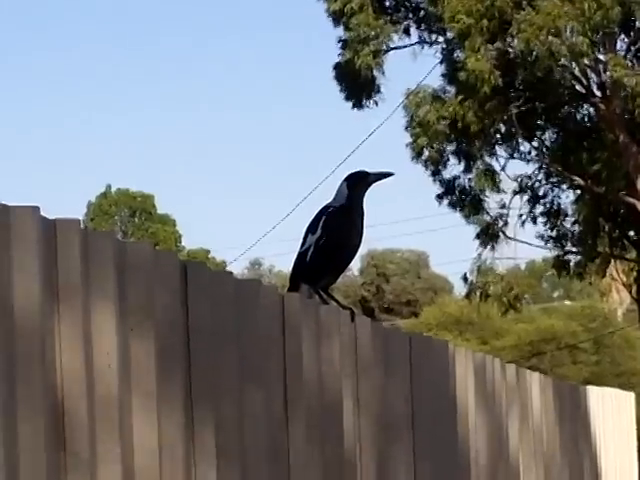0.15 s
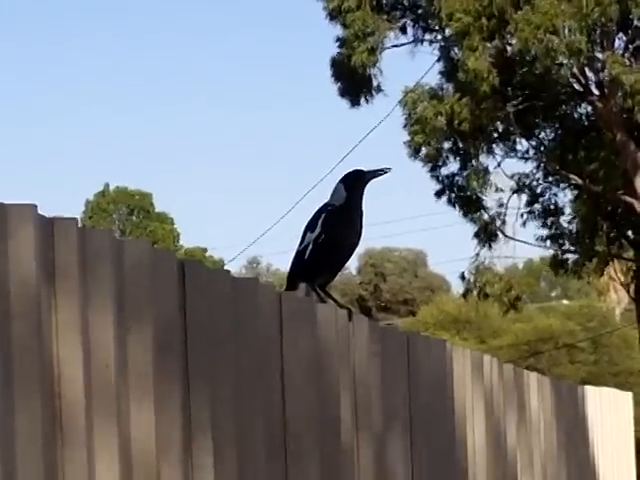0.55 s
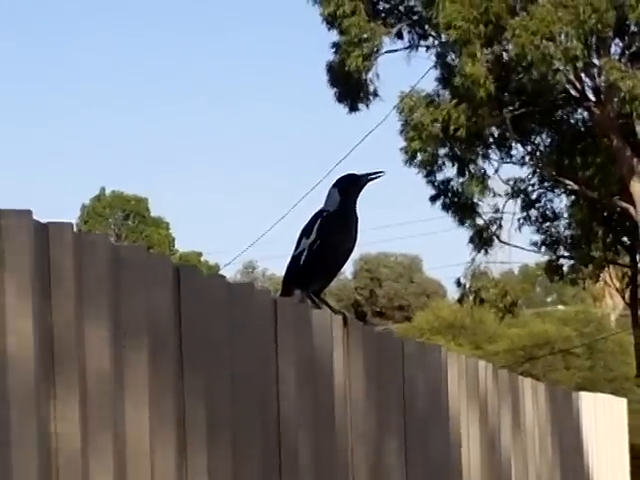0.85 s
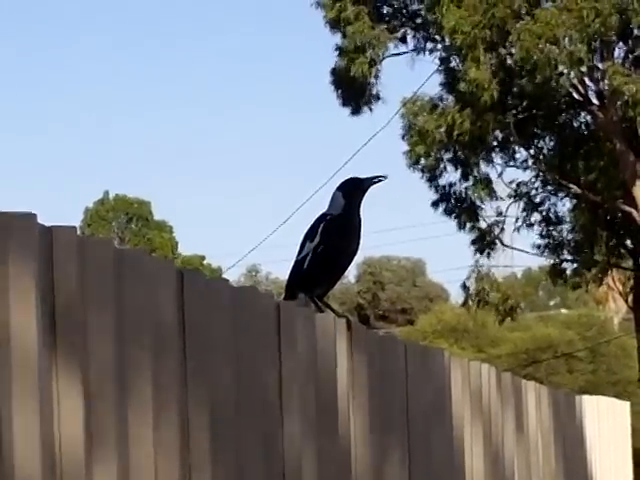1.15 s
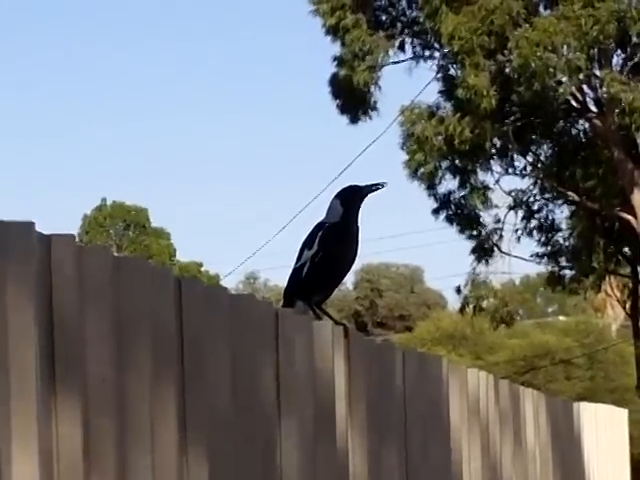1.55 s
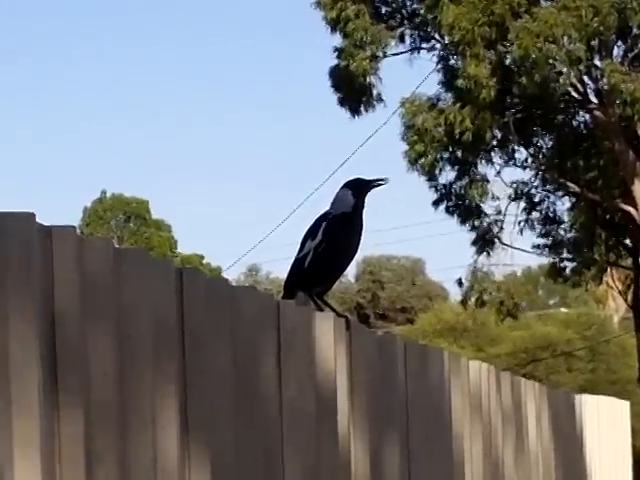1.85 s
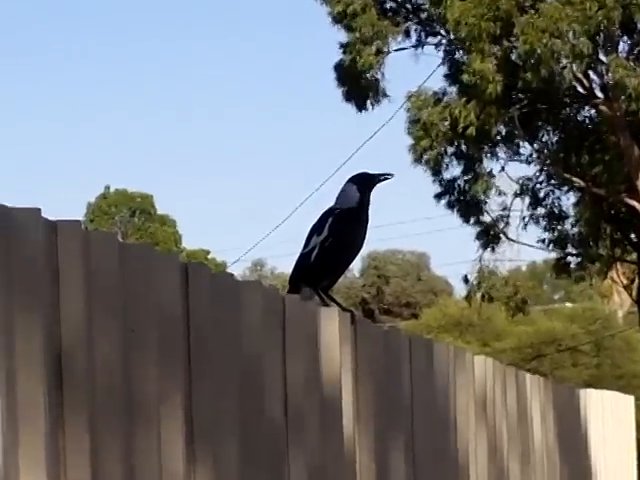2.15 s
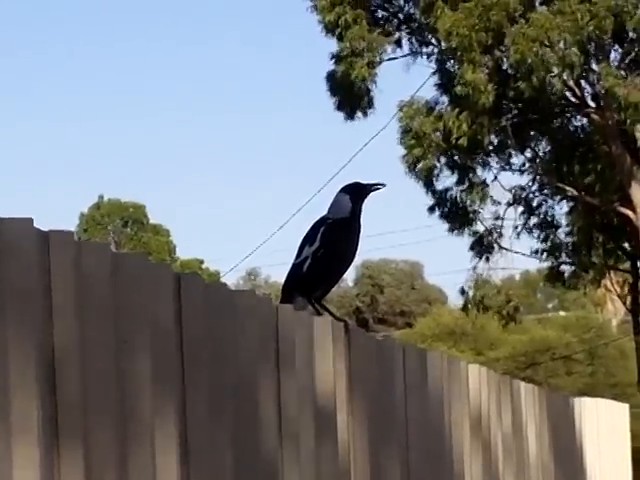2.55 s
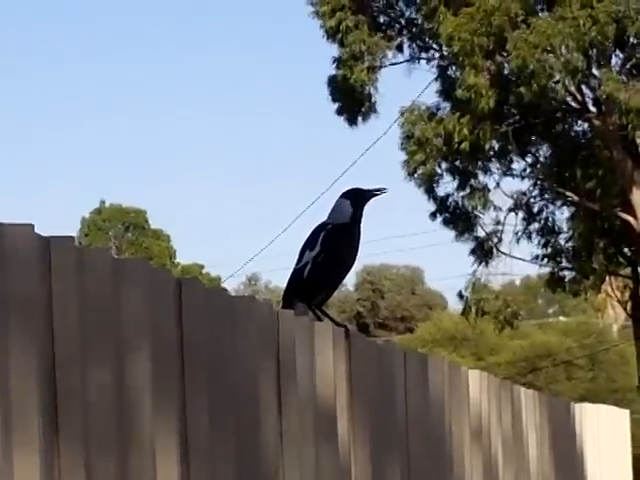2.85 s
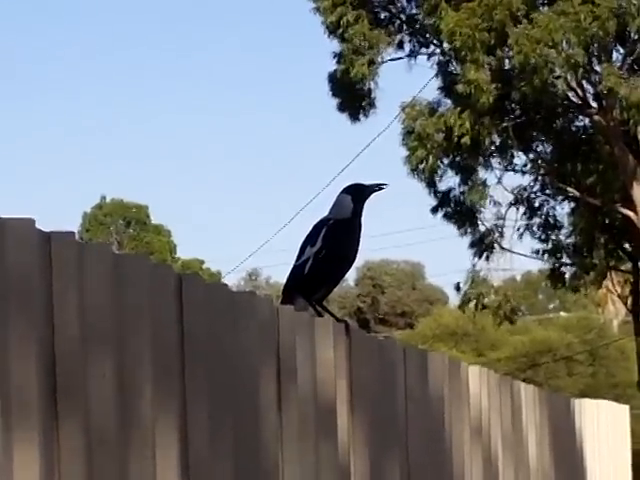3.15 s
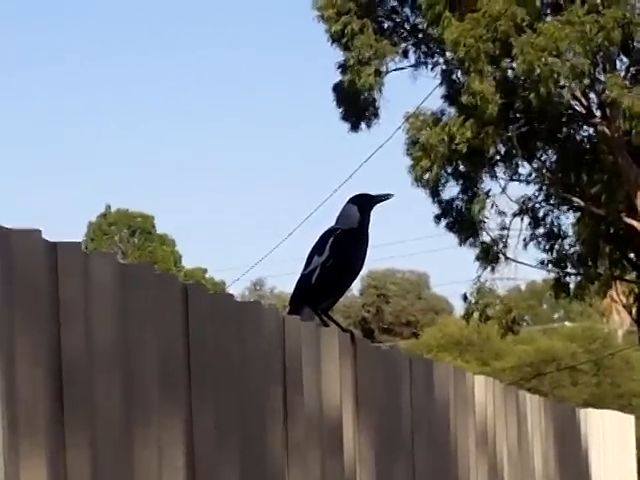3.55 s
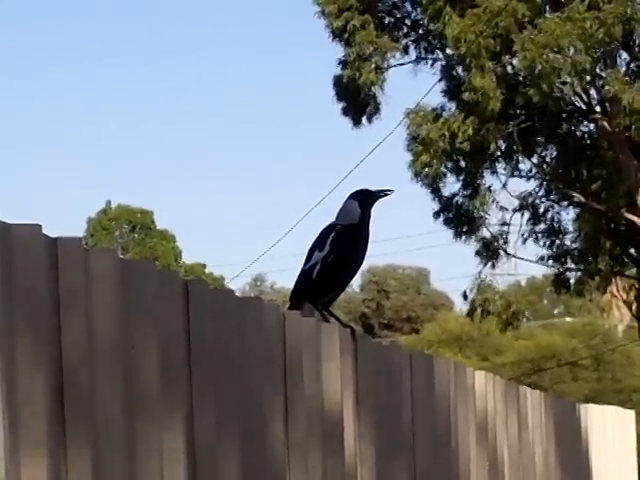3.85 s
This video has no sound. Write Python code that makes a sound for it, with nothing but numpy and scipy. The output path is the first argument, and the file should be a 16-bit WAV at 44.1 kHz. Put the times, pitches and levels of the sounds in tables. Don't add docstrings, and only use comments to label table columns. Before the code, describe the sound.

A magpie warbles mid-pitched, flute-like notes, some throbbing in quick pulses, others doubled or raspy. Pulses come near 0.5 s, a long wavering note 0.6-0.8, a steady one at 1.0-1.2, then softer low bits. Two loud buzzy chirps from a small bird strike at 1.95 and 2.05. Falling notes follow at 2.2-2.4 and 3.2, fluttering bits to 4. Faint peeps, dull yard echo, steady traffic hum, car swell at 3.

```python
import sys
import numpy as np
from scipy import signal
from scipy.fft import rfft, irfft
from scipy.io import wavfile
from scipy.ndimage import uniform_filter1d

SR = 44100
rng = np.random.default_rng(int(sys.argv[2]) if len(sys.argv) > 2 else 0)


def amplitude_ratio(level_db):
    exponent = np.asarray(level_db, float) / 20
    return 10 ** exponent


def unload_wav(signal):
    wavfile.write(
        sys.argv[1],
        SR,
        np.round(np.clip(np.atleast_2d(signal).T, -1, 1) * 32767).astype(np.int16),
    )


N = 176400


def colour(x, points):
    hz, db = np.array(points, float).T
    log_f = np.log(np.arange(len(x) // 2 + 1) * SR / len(x) + 1)
    gain = amplitude_ratio(np.interp(log_f, np.log(hz), db))
    return irfft(rfft(x) * gain, len(x))


def unit(x):
    return x / np.sqrt(np.mean(x ** 2))


def walk(rate_hz):
    values = np.interp(np.arange(N) * rate_hz / SR, np.arange(8192), rng.standard_normal(8192))
    return unit(uniform_filter1d(values, max(int(SR / rate_hz), 2)))


# frequency_hz, level_db
THROAT_OVERTONES = [(1500, -27), (2020, -22), (2350, -45), (3000, -30), (3500, -36), (4500, -31),
                    (5700, -40), (7000, -47)]


def whistle(curves, bend, flutter_db, edge_s):
    effort, loud_db = 1.2, -40
    out = np.zeros(N)
    throat = np.array(THROAT_OVERTONES).T
    unsteady = [amplitude_ratio(2.8 * walk(35) - 2.5) for k in range(7)]
    for rows in curves:
        s, hz, db = np.array(rows, float).T
        i = np.arange(max(int(s[0] * SR), 0), min(int(s[-1] * SR), N))
        t = i / SR
        to_nearest_end = np.minimum(t - s[0], s[-1] - t)
        edge = np.sin(np.pi / 2 * np.clip(to_nearest_end / edge_s, 0, 1)) ** 2
        f = np.interp(t, s, hz) * bend[i]
        level_db = np.interp(t, s, db) + flutter_db[i]
        phase = 2 * np.pi * np.cumsum(f) / SR
        overtones = 0
        for k in range(2, 7):
            overtones = overtones + amplitude_ratio(np.interp(k * f, *throat)) * unsteady[k][i] * np.sin(k * phase)
        tone = np.sin(phase) + overtones * amplitude_ratio(effort * (level_db - loud_db))
        out[i] += amplitude_ratio(level_db) * edge * np.sqrt(2) * tone
    return out


def glides(rows):
    return [[(s, first_hz, db), (s + length_s, last_hz, db)] for s, length_s, first_hz, last_hz, db in rows]


# frequency_hz, density_db
TRAFFIC_SPECTRUM = [(22, -40.5), (100, -17), (350, -12), (1100, 0.5), (2000, -10.5), (2600, -19),
                    (8000, -27.5), (12800, -35)]
# peak_s, rise_s, fall_s, level_db
RUSH_TIMES = [
    (2.987, 0.03, 0.39, -56),
    (0.021, 0.074, 0.12, -65),
]
# frequency_hz, gain_db
RUSH_SPECTRA = [
    [(150, -30), (700, 4), (1200, 2), (2200, -13.5), (4500, -17), (9000, -39)],
    [(500, -20), (1200, -5), (2500, -7), (5000, -4.5), (7500, -3.5), (10000, -28)],
]


def town():
    t = np.arange(N) / SR
    hum_db = -60 + 0.5 * walk(1.5) + 0.7 * walk(9)
    out = unit(colour(rng.standard_normal(N), TRAFFIC_SPECTRUM)) * amplitude_ratio(hum_db)
    for (peak_s, rise_s, fall_s, db), points in zip(RUSH_TIMES, RUSH_SPECTRA):
        swell = np.exp(-((t - peak_s) / np.where(t < peak_s, rise_s, fall_s)) ** 2)
        rush = unit(colour(rng.standard_normal(N), points))
        out = out + rush * swell * amplitude_ratio(db + walk(25))
    return signal.sosfilt(signal.butter(6, 13000, fs=SR, output="sos"), out)


# start_s, length_s, first_hz, last_hz, level_db
FAR_WHISTLES = [(.09, .13, 3250, 3850, -73), (.19, 0.09, 3500, 3200, -73), (1.53, 0.21, 4520, 4560, -73),
                (1.545, .19, 4830, 4800, -74.5), (1.74, .1, 4620, 4500, -79),
                (3.33, 0.221, 3301, 3101, -75.5), (0.0, 0.017, 1286, 1911, -54.6),
                (2.781, .41, 733, 691, -64.1), (1.331, 0.092, 1049, 1321, -57.1),
                (1.751, .101, 995, 1310, -59.1), (1.42, .3, 3350, 3250, -77), (3.04, .08, 4500, 4450, -78)]
# start_s, length_s, first_hz, last_hz, level_db
FAR_PEEPS = [(.17, .11, 3750, 3900, -76), (.27, .035, 5150, 5150, -75), (.385, .022, 4100, 4800, -73),
             (.655, .04, 3760, 3550, -69), (1.228, .04, 4220, 3920, -72), (1.272, .033, 3950, 4180, -73),
             (1.35, .032, 3320, 3080, -73), (1.39, .035, 2820, 2740, -80), (1.32, .09, 5450, 5480, -81),
             (1.62, .2, 4000, 4000, -78), (1.67, .065, 6220, 6050, -79), (2.812, .018, 4400, 4950, -69),
             (3.052, .028, 6000, 6150, -77.5), (3.11, .025, 6200, 6300, -77), (3.084, .02, 6150, 6200, -77),
             (3.13, .02, 5600, 5200, -76), (3.195, .025, 8900, 8400, -77)]


def far_birds():
    out = 0
    t = np.arange(SR // 2) / SR
    for rows, waver, t60_s in ((FAR_WHISTLES, 0.034, 0.45), (FAR_PEEPS, 0.006, 0.08)):
        direct = whistle(glides(rows), 1 + waver * walk(500), 2.5 * walk(90), 0.0084)
        smear = rng.standard_normal(SR // 2) * 1000 ** (-t / t60_s)
        out = out + signal.fftconvolve(direct, smear / np.linalg.norm(smear))[:N]
    return out


# time_s, pitch_hz, level_db
CHIRP_ARCHES = [
    [(1.944, 1730, -62), (1.95, 1786, -45.5), (1.958, 1865, -41), (1.968, 1734, -46), (1.978, 1620, -55.5),
     (1.987, 1490, -71)],
    [(2.037, 1870, -66), (2.043, 1961, -46), (2.052, 2216, -39), (2.063, 2387, -36), (2.085, 2433, -42.5),
     (2.098, 2290, -45), (2.107, 2170, -54)],
]
# rate_hz, depth as share of pitch, breath as share of tone, half_lines_db
CHIRP_BUZZES = [
    (433, .1, .5, -9),
    (303, .085, .34, -13),
]
# frequency_hz, gain_db
CHIRP_SPECTRUM = [(1500, -22), (2050, -7.5), (2600, -35), (3300, -3), (4800, 0.5), (5900, -2), (7200, -5),
                  (10800, -27.5), (13500, -22.5)]


def small_bird():
    buzz_level_db, brighten_db = 2.8, 3
    out, t = 0, np.arange(N) / SR
    tilt_db_per_multiple = [1.6, -0.5]
    for rows, buzz, tilt_db in zip(CHIRP_ARCHES, CHIRP_BUZZES, tilt_db_per_multiple):
        buzz_hz, depth, breath, half_db = buzz
        s, hz, db = np.array(rows).T
        shake = np.sin(2 * np.pi * np.cumsum(buzz_hz * (1 + 0.015 * walk(100))) / SR)
        f = np.interp(t, s, hz) * (1 + depth * shake + 0.015 * walk(900))
        phase = 2 * np.pi * np.cumsum(f) / SR
        progress = np.interp(t, s[[0, -1]], [-0.5, 0.5], 0, 0)
        slope_db = tilt_db + brighten_db * progress
        stack = 0
        for k in range(2, 16):
            stack = stack + amplitude_ratio(slope_db * k / 2 + half_db * (k % 2)) * np.sin(k * phase / 2)
        voice = unit(stack) + breath * rng.standard_normal(N)
        chirp = unit(colour(voice * amplitude_ratio(buzz_level_db * shake), CHIRP_SPECTRUM))
        out = out + chirp * amplitude_ratio(np.interp(t, s, db, -200, -200))
    return out


# time_s, pitch_hz, level_db
HIGH_NOTES = [
    [(.565, 1173, -58.5), (.615, 1166, -49), (.635, 1226, -54.5), (.66, 1257, -50), (.68, 1190, -39.5),
     (.715, 1140, -40), (.735, 1128, -41), (.77, 1144, -39), (.793, 1171, -45.5)],
    [(1.015, 1238, -57.5), (1.05, 1200, -43.5), (1.095, 1156, -42), (1.11, 1138, -44), (1.122, 1156, -43.5),
     (1.18, 1154, -60.5)],
    [(2.342, 1187, -43), (2.37, 1156, -46.5), (2.4, 1215, -54.5), (2.43, 1120, -59)],
]
# time_s, pitch_hz, level_db
LOW_NOTES = [
    [(2.2, 1053, -45), (2.22, 1050, -42), (2.255, 1037, -40.5), (2.278, 995, -47), (2.292, 1008, -47.5),
     (2.308, 1030, -49)],
    [(3.18, 1029, -50.5), (3.207, 1033, -53), (3.225, 1021, -40), (3.255, 999, -40), (3.284, 978, -47.5),
     (3.302, 985, -43), (3.33, 1005, -60)],
    [(3.345, 1011, -53), (3.37, 995, -52.5), (3.45, 972, -57.5)],
]
# time_s, pitch_hz, level_db
DEEP_NOTES = [
    [(1.42, 798, -56), (1.455, 698, -53), (1.48, 721, -49.5), (1.52, 732, -48.5)],
    [(2.505, 700, -57.5), (2.55, 759, -62.5), (2.59, 720, -56.5)],
]
# time_s, pitch_hz, level_db
THROBBING_NOTES = [
    [(2.607, 1120, -60), (2.614, 1140, -54), (2.619, 1135, -61), (2.626, 1140, -47.5), (2.632, 1130, -56),
     (2.638, 1120, -45), (2.645, 1110, -60)],
    [(.84, 1135, -54), (.85, 1130, -47), (.856, 1110, -58), (.866, 1126, -45), (.873, 1118, -59),
     (.881, 1127, -48), (.889, 1115, -57)],
    [(.445, 1040, -51), (.453, 1035, -51), (.459, 987, -40.5), (.466, 997, -53), (.472, 950, -44),
     (.48, 940, -58)],
    [(.494, 920, -52), (.502, 927, -51), (.509, 936, -56), (.515, 950, -41.5), (.522, 950, -58),
     (.528, 966, -42.5), (.535, 965, -53), (.542, 975, -42.5), (.549, 980, -59)],
    [(3.832, 1067, -59), (3.845, 1045, -52), (3.855, 1045, -54.5), (3.876, 1052, -42), (3.884, 1073, -51),
     (3.89, 1070, -48.5), (3.903, 1080, -57)],
    [(3.808, 680, -64), (3.838, 690, -53.5), (3.862, 715, -59)],
]
# start_s, length_s, first_hz, last_hz, level_db
UPPER_VOICE = [(.384, 0.046, 1357, 1323, -51.5), (.395, 0.049, 1186, 1126, -52.5),
               (.805, 0.037, 1151, 1142, -54), (.96, 0.024, 1392, 1343, -52.5),
               (.975, 0.032, 1200, 1155, -47.5), (1.2, 0.095, 1156, 1124, -62),
               (1.37, 0.036, 1520, 1596, -52.5), (1.836, 0.012, 1430, 1170, -47),
               (1.917, 0.016, 1120, 1160, -56.5), (1.94, 0.024, 1150, 1196, -51.5),
               (2.161, 0.025, 1196, 1144, -45), (2.186, .016, 1140, 1120, -51.5),
               (2.66, 0.052, 1289, 1364, -50.5), (2.77, 0.026, 1660, 1500, -57),
               (2.814, 0.026, 1157, 1153, -43.5), (2.85, 0.021, 1130, 1140, -49.5),
               (3.19, 0.022, 1665, 1230, -57.5), (3.624, 0.032, 1464, 1340, -56),
               (3.716, 0.025, 1130, 1220, -51), (3.608, 0.017, 1198, 1760, -60),
               (3.808, 0.028, 1185, 1130, -56.5), (3.905, 0.022, 1110, 1170, -59),
               (3.754, 0.028, 1200, 1110, -54), (3.93, 0.035, 1125, 1200, -56)]
# start_s, length_s, first_hz, last_hz, level_db
LOWER_VOICE = [(0.562, 0.069, 977, 999, -58.5), (0.635, 0.028, 1020, 932, -51),
               (0.832, 0.058, 1053, 945, -53), (0.978, 0.0283, 1010, 986, -50.5),
               (1.032, 0.05, 1030, 969, -54), (1.713, 0.03, 808, 620, -58.5), (1.742, .014, 975, 1010, -55),
               (1.878, .02, 810, 670, -59), (1.854, 0.028, 957, 1040, -50.5), (2.001, 0.069, 805, 649, -61),
               (2.608, 0.028, 1087, 1040, -56.5), (2.707, 0.03, 1012, 994, -56.5),
               (2.836, 0.019, 994, 1034, -49), (3.344, 0.1, 695, 749, -59),
               (3.764, 0.018, 1060, 1000, -53.5), (3.79, 0.017, 1013, 960, -49),
               (3.702, 0.04, 962, 1020, -58.5), (3.978, 0.029, 1058, 1040, -63)]


def magpie():
    waver, flutter_hz = 0.0036, 88.83
    wobble, flutter = waver * walk(60), walk(flutter_hz)
    held_notes = HIGH_NOTES + LOW_NOTES + DEEP_NOTES + THROBBING_NOTES
    out = whistle(held_notes, 1 + 0.53 * wobble, 0.62 * flutter, 0.0061)
    for rows in (UPPER_VOICE, LOWER_VOICE):
        voice = whistle(glides(rows), 1 + 1.9 * waver * walk(80), walk(flutter_hz), 0.0056)
        rasp = 1 + 0.3 * walk(600)
        out = out + voice * rasp
    return out


def yard(x):
    echo_s, echo_db = 0.123, -16.5
    tail_db, t60_s, dull_hz = -12.5, 0.79, 4440
    t = np.arange(SR) / SR
    tail = rng.standard_normal(SR) * 1000 ** (-t / t60_s) * np.clip(t / 0.026, 0, 1)
    wall = rng.standard_normal(SR) * np.exp(-((t - echo_s) / 0.0015) ** 2)
    response = amplitude_ratio(tail_db) * tail / np.linalg.norm(tail) + amplitude_ratio(echo_db) * wall / np.linalg.norm(wall)
    dull = signal.lfilter(*signal.butter(1, dull_hz, fs=SR), response)
    return signal.fftconvolve(x, dull)[:N]


def scene():
    birds = magpie() + small_bird() + far_birds()
    return (birds + yard(birds) + town())[None]


def top_cut(x):
    return signal.sosfilt(signal.butter(12, 15610, fs=SR, output="sos"), x)


def record(dry):
    x = signal.lfilter(*signal.iirnotch(11360, 39, fs=SR), dry)
    x = signal.sosfilt(signal.ellip(8, 0.2, 60, 15350, fs=SR, output="sos"), x)
    return top_cut(x)


dry = scene()
out = record(dry)
unload_wav(out)
```